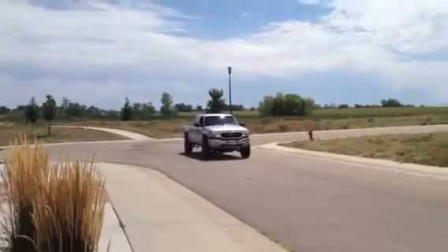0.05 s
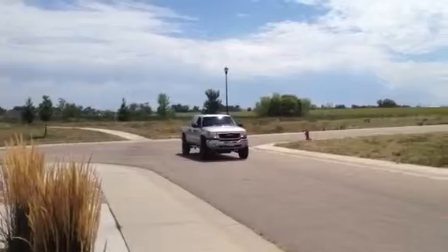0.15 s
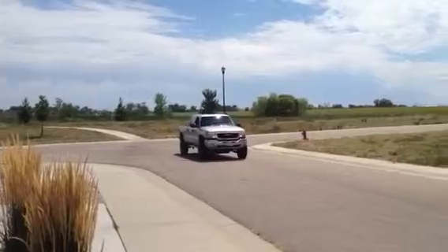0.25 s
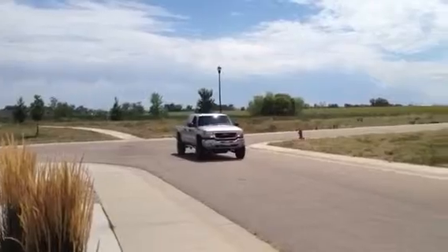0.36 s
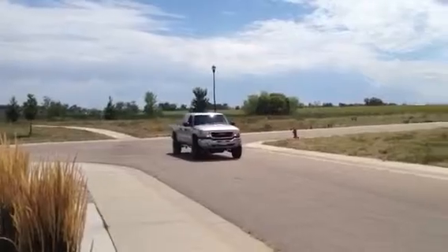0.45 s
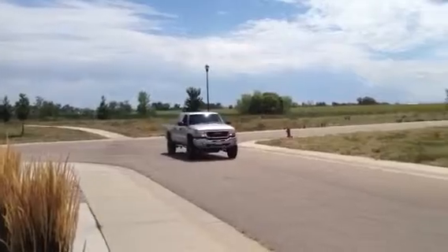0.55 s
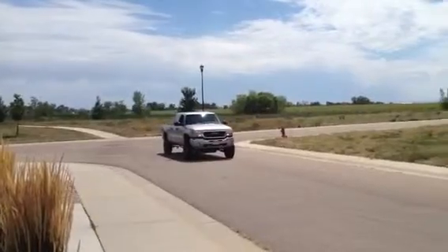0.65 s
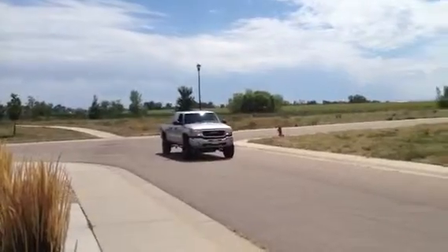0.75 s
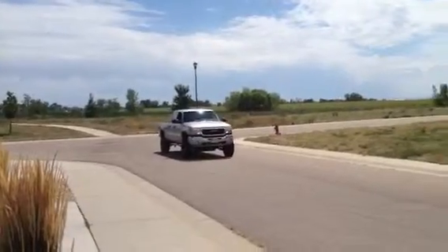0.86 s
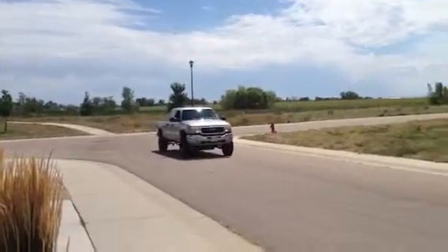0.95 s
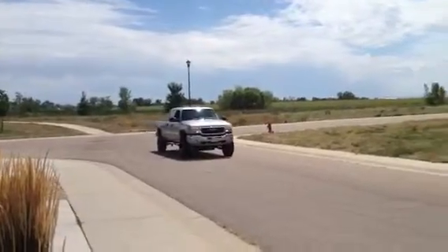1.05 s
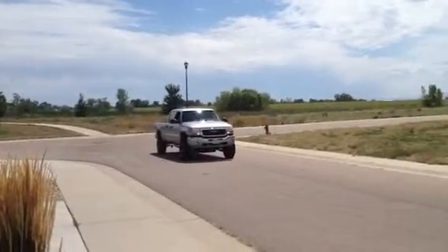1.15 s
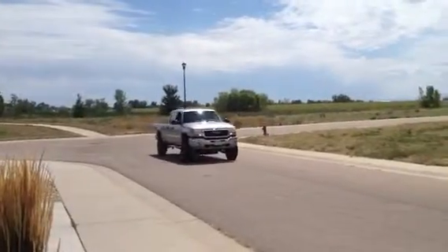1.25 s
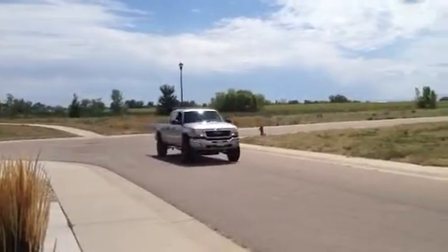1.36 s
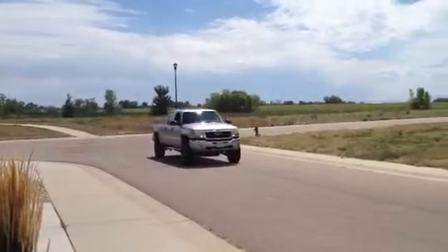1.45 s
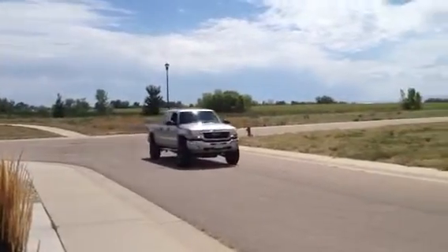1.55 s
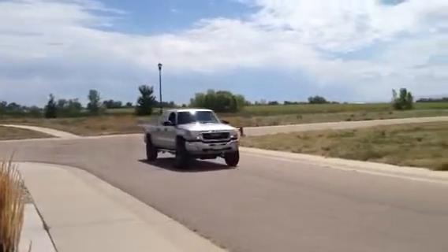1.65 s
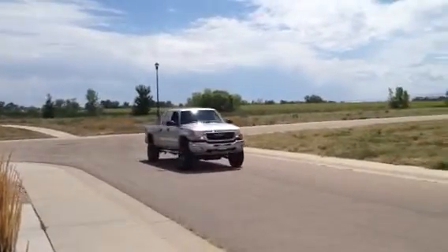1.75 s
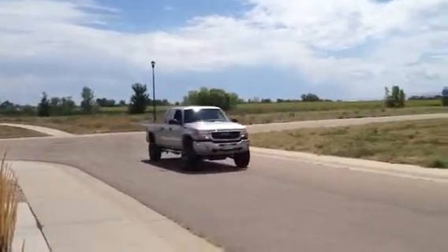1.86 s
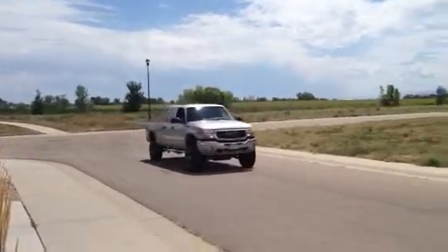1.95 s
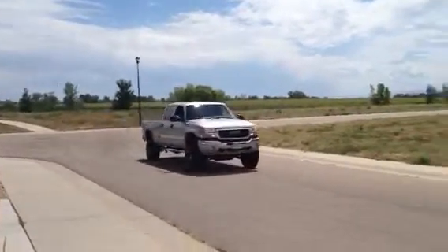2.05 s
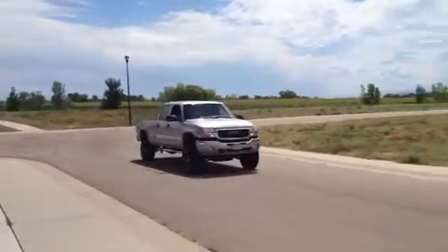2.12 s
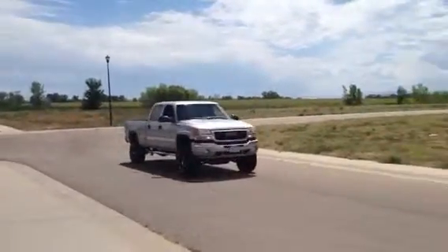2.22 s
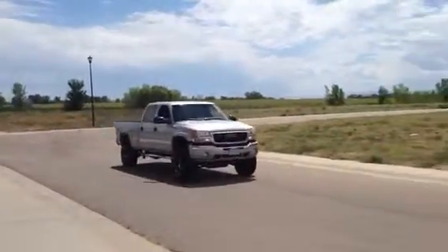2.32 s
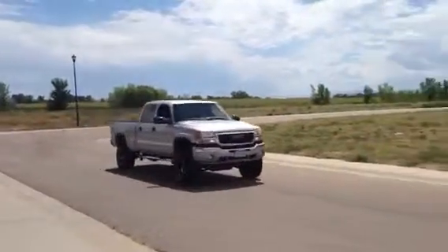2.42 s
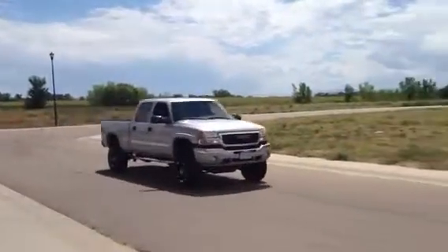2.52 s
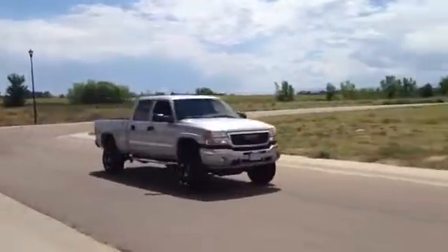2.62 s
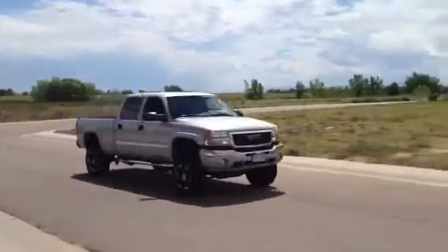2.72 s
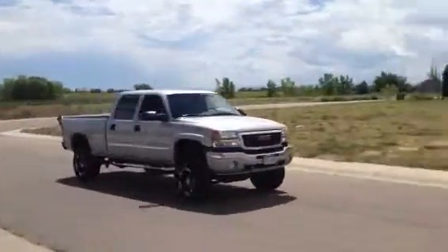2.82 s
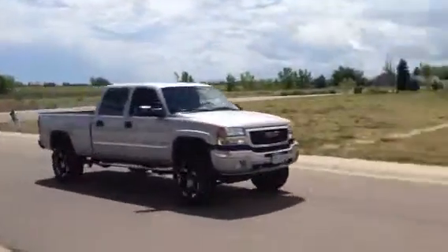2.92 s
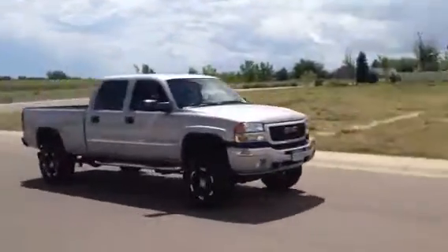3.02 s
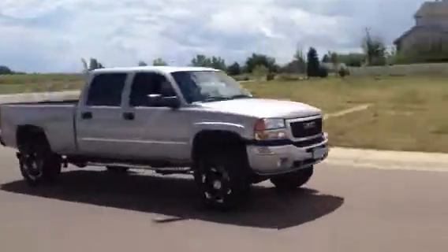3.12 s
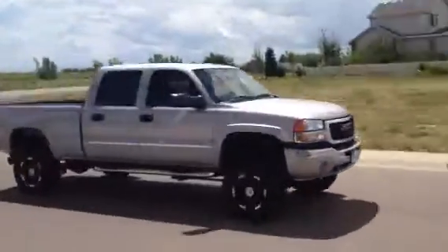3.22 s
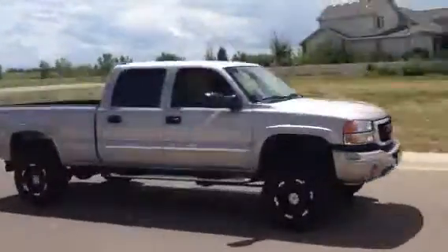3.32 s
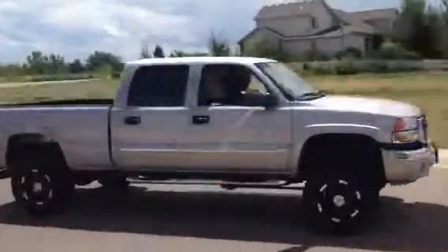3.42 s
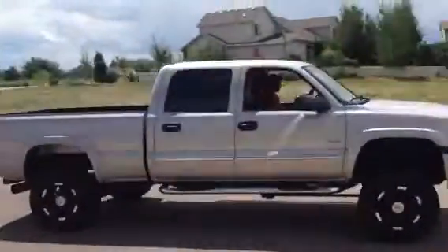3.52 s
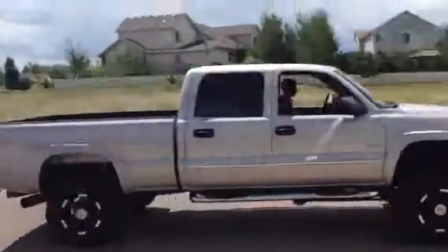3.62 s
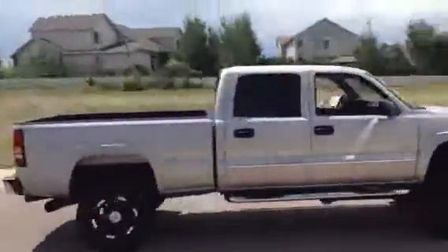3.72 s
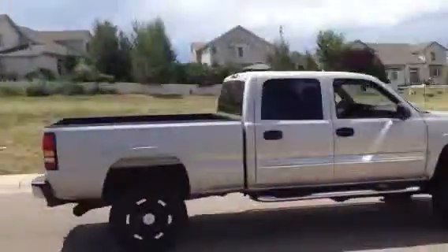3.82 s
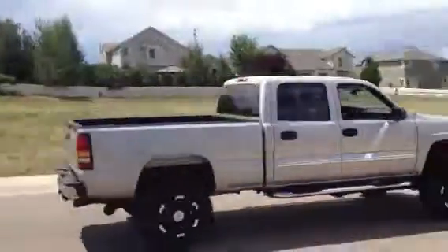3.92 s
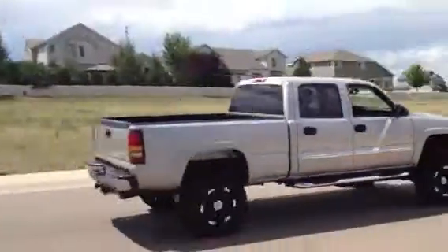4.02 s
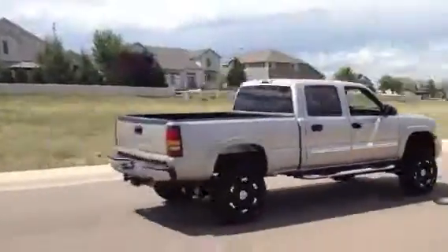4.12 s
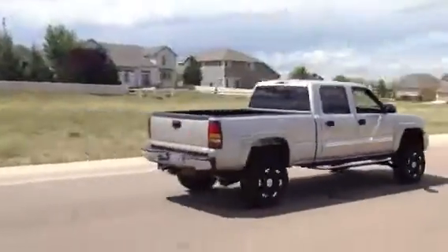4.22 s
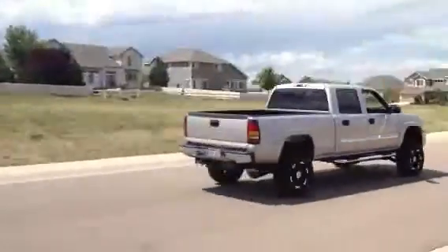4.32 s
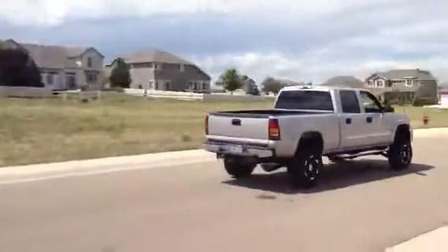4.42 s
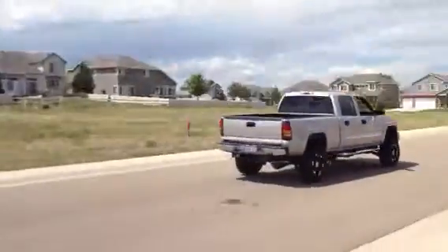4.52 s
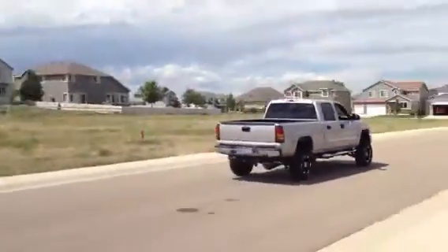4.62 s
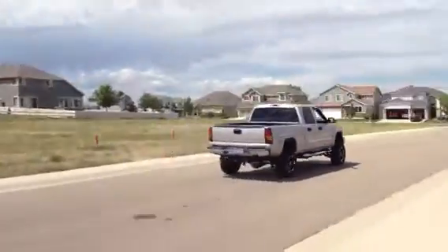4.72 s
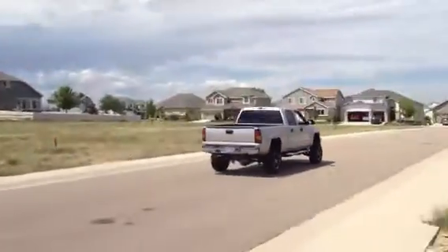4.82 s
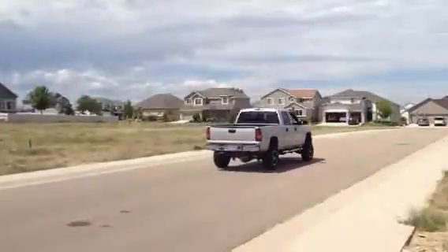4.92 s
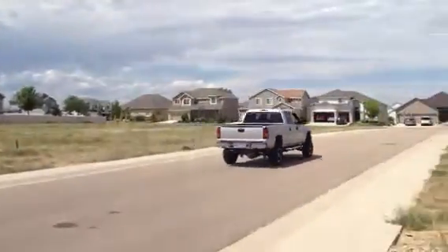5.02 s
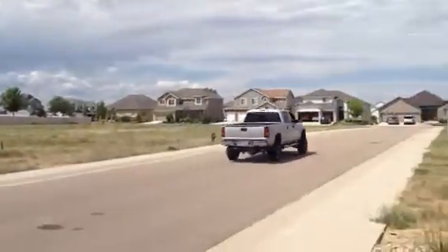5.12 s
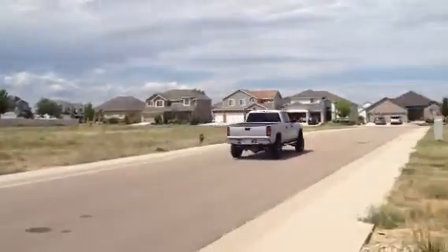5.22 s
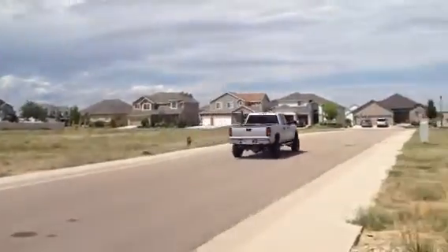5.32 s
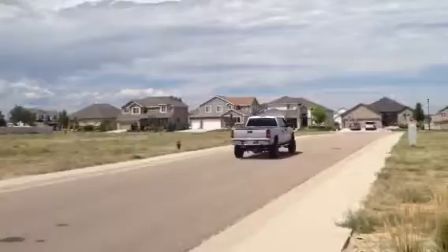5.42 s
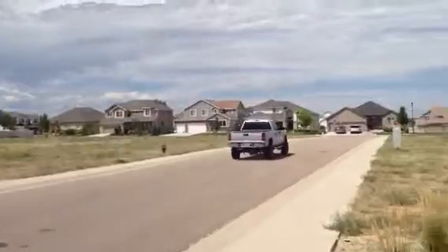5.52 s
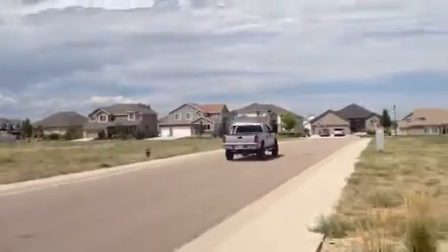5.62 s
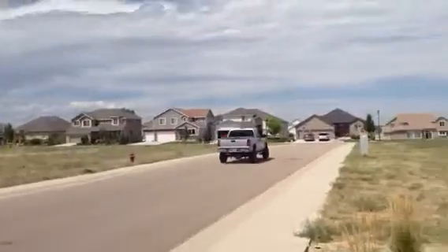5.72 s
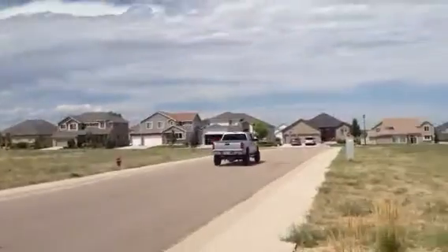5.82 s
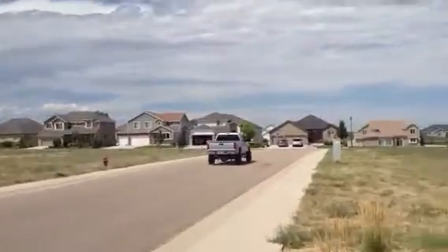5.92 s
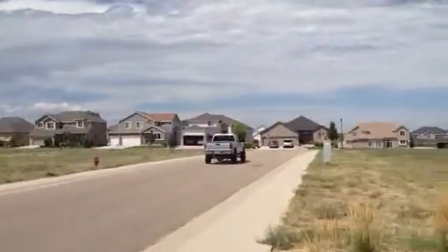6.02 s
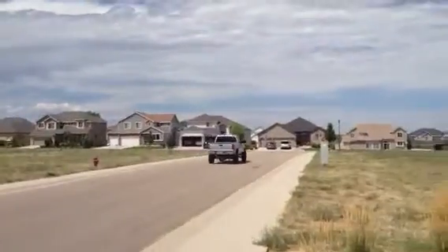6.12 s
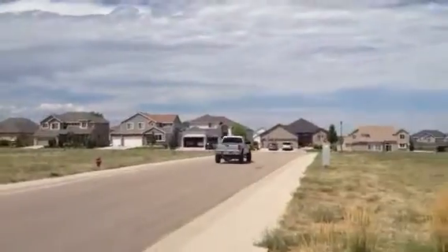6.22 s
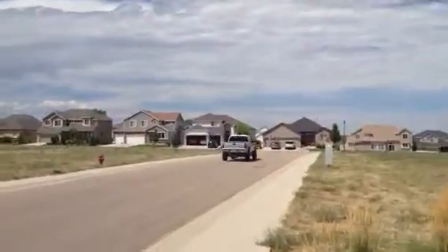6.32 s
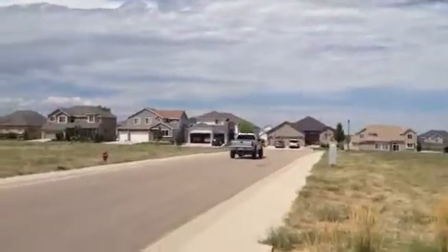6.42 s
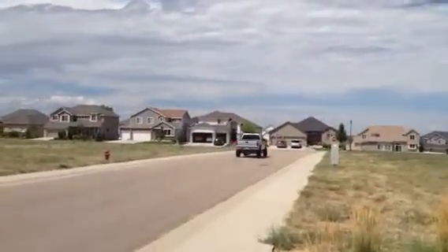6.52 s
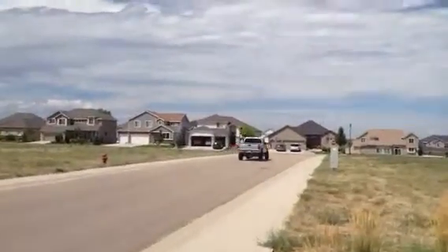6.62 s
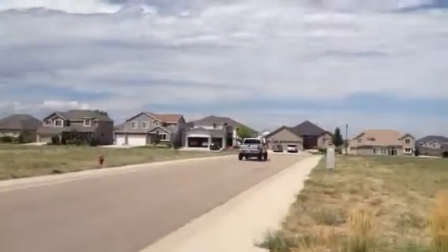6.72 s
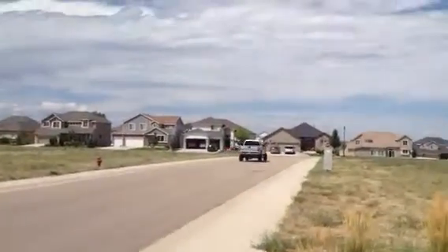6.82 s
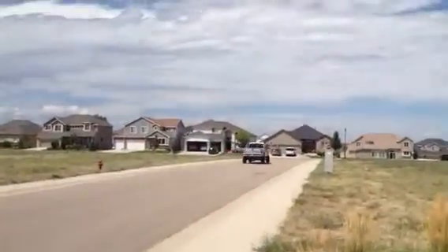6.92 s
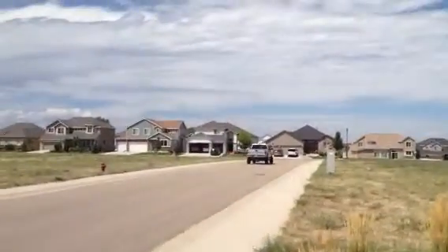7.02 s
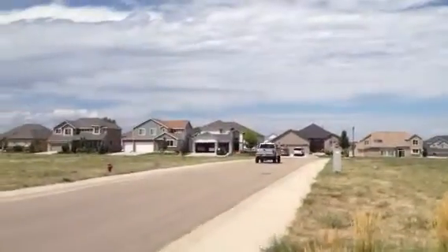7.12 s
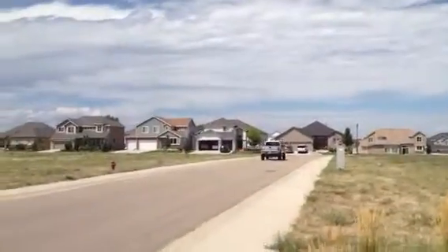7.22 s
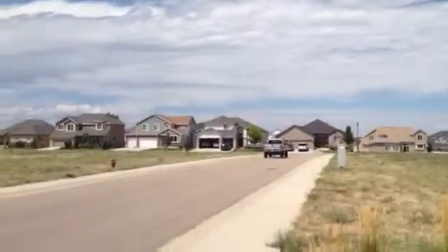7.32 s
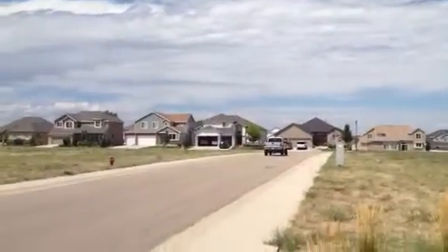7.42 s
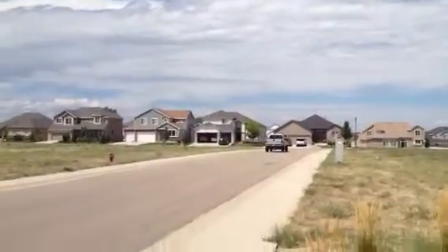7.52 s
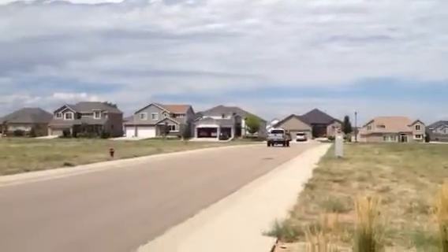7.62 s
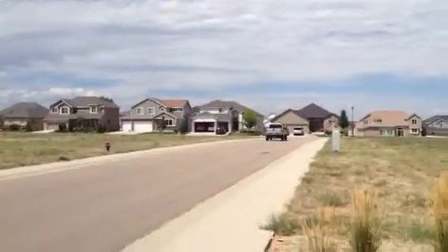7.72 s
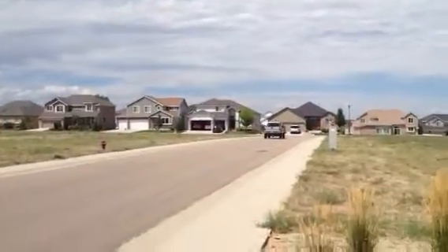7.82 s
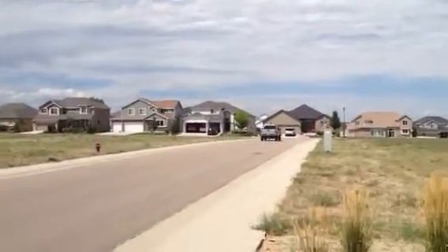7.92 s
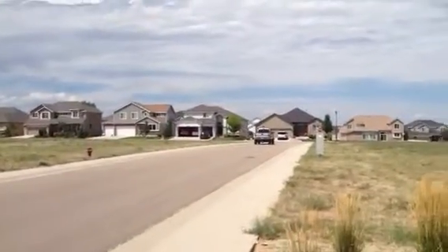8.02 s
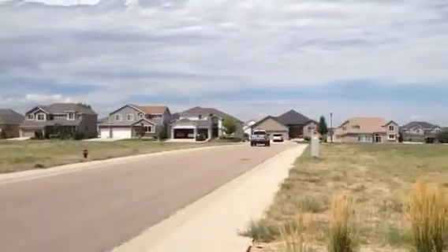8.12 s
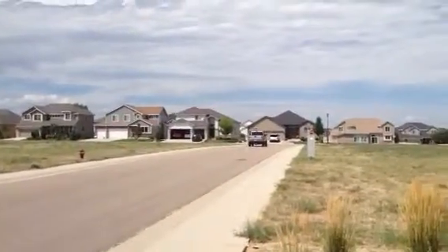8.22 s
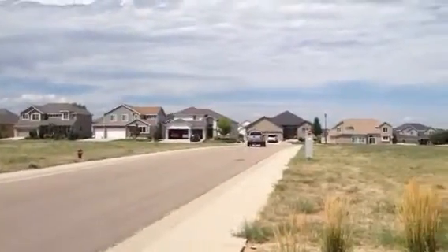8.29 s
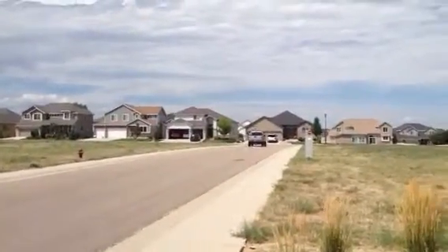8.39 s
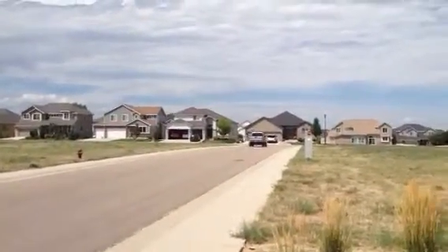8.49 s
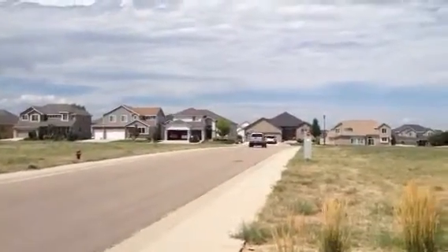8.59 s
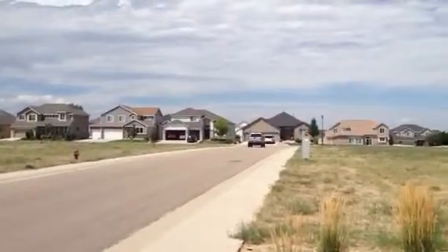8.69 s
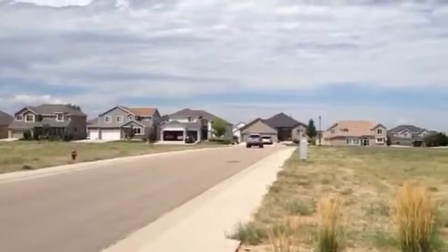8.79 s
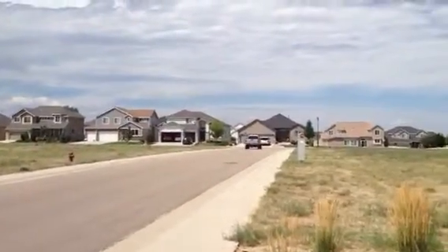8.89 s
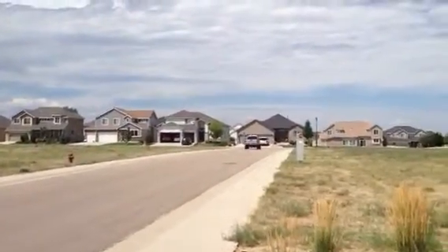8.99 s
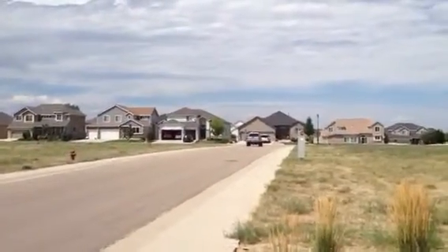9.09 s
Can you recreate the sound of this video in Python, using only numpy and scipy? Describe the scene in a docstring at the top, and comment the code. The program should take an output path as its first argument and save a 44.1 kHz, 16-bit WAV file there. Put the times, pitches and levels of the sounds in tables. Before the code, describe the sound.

Heard from a phone at the roadside: a diesel truck's smooth low hum swells into a forceful, buzzing growl with hissing intake and a rough whine at peak revs. The note drops at a gear change as the truck sweeps by, deep thuds bumping the microphone. Its tailpipe drones and barks while leaving, then the driver lifts off with a pop, grainy burble and sinking whoosh. Only faint distant town air and slight dry grass rustle remain.

```python
"""Diesel pickup pulling away

A V8 diesel pickup pulls away hard, shifts up as it passes a phone at the kerb, lifts off and rolls away.
The exhaust is sine tones in step with the engine, plus a bark of uneven pulses ringing in the tailpipe.
Filtered noise makes the tyre and engine-bay roar, body boom, intake hiss and fan rush; noisy gliding
tones make the turbo. Thuds, dry grass and a faint distant town lie beneath."""
import sys
import numpy as np
from scipy import signal
from scipy.fft import rfft, irfft, next_fast_len
from scipy.io import wavfile
from scipy.ndimage import uniform_filter1d

SR = 44100
rng = np.random.default_rng(int(sys.argv[2]) if len(sys.argv) > 2 else 0)


def int16_out(signal):
    """Quantize to a 16-bit WAV file."""
    q = np.round(np.clip(np.atleast_2d(signal).T, -1, 1) * 32767)
    wavfile.write(sys.argv[1], SR, q.astype(np.int16))


N = 403515
TIME = np.arange(N) / SR  # s

# Noise of the passing truck: (time [s], road roar [dB], body boom [dB], intake hiss [dB])
NOISE_LEVELS = [(0.0, -39.5, -42, -47), (1.3, -36, -37.5, -40.5), (1.8, -34, -35, -40),
                (2.3, -27.5, -32.5, -31.5), (2.5, -27.5, -27.5, -30), (2.73, -24, -25.5, -27),
                (2.8, -25.5, -28.5, -28.5), (2.88, -24.5, -26, -27.5), (2.92, -28.5, -30.5, -28.5),
                (3.3, -25, -28.5, -26.5), (3.41, -23.5, -32, -28.5), (3.55, -26, -32, -30),
                (3.9, -22.5, -29, -32), (4.1, -26, -30.5, -33.5), (4.25, -26.5, -33, -34.5),
                (4.4, -28.5, -35, -38), (5.07, -29, -25, -39.5), (5.45, -31, -30, -43),
                (5.55, -29.5, -31, -41), (5.65, -31.5, -28, -43), (5.71, -31, -35, -39.5),
                (5.76, -35, -37, -49), (5.78, -34, -28, -44.5), (6.19, -40, -43.5, -52),
                (6.75, -46.5, -50.5, -60), (7.25, -48.5, -49, -58), (7.57, -52, -54, -72),
                (8.41, -59, -58, -69.5), (9.15, -62.5, -63, -77)]
# One backfire as the throttle shuts: (time [s], level over the loudest usual bark [dB])
LIFT_POP = (5.779, 4)
COAST_DB = -8  # drop of the weak tones and the rumble off throttle

# The five views are the sides of the truck heard: 0 nose far, 1 nose near, 2 flank, 3 tail, 4 tail far.


def undb(db):
    """Turn decibels into a plain gain."""
    return 10 ** (np.asarray(db) / 20)


def unit(x):
    """Scale to an RMS level of 1."""
    return x / np.sqrt(np.mean(x ** 2))


def curves(table):
    """Draw each column of a table over time, with straight lines between its points."""
    s, *columns = np.transpose(table)
    return [np.interp(TIME, s, column) for column in columns]


def seen(view, view_db):
    """A level that depends on the side of the truck heard; beyond the last view it stays put."""
    return np.interp(view, range(len(view_db)), view_db)


def peak(x, hz, width_hz):
    """One resonance, which lets through mainly the sound near its own pitch."""
    return signal.lfilter(*signal.iirpeak(hz, hz / width_hz, fs=SR), x)


def walk(rate_hz):
    """A random wander: new levels at the given rate, joined smoothly; its spread is near 1."""
    position = TIME * rate_hz
    steps = rng.standard_normal(int(position[-1]) + 2)
    whole = position.astype(int)
    part = position % 1
    ease = part * part * (3 - 2 * part)
    return 1.2 * (steps[whole] + (steps[whole + 1] - steps[whole]) * ease)


def exhaust(cycle_hz, cycles, view, near_db, off_throttle):
    """Firings repeat each four-stroke cycle, so they sound as tones at multiples of the cycle rate."""
    # Strong tones: (time [s], multiple 8 (the firing rate) [dB], multiple 10 [dB], multiple 16 [dB])
    strong_levels = [(0.0, -37.5, -50, -38.5), (0.45, -40.5, -39, -42), (1.15, -36.5, -37, -37),
                     (1.55, -26.5, -32, -36.5), (2.0, -27, -26, -33), (2.38, -24.5, -18.5, -37),
                     (2.6, -14.5, -17.5, -46), (2.7, -18, -21, -36), (2.8, -11.5, -21.5, -47),
                     (2.9, -10, -29, -48), (3.15, -13, -30, -57), (3.31, -15.5, -20.5, -21.5),
                     (3.5, -13, -21, -35), (3.68, -14.5, -15.5, -28), (3.87, -19, -16, -48),
                     (4.02, -15.5, -14.5, -34), (4.12, -17, -19, -38), (4.28, -12.5, -16.5, -29),
                     (4.4, -12, -24, -35.5), (4.65, -17, -22.5, -29), (4.8, -17, -32, -38),
                     (5.0, -13.5, -24, -38), (5.2, -20.5, -27.5, -33.5), (5.5, -15.5, -33, -44),
                     (5.7, -17.5, -34, -58), (5.77, -20.5, -33, -48), (5.8, -28, -42, -52),
                     (5.92, -38, -50, -53), (6.17, -38.5, -45.5, -64), (6.3, -41, -39, -60),
                     (6.45, -47, -41, -62), (6.8, -52, -50.5, -61), (7.4, -56, -57, -62),
                     (7.75, -73, -74, -65), (9.15, -71, -79, -74)]
    # The three strong multiples: [times the cycle rate]
    strong_multiples = (8, 10, 16)
    # Slow swings of those three: [dB]
    strong_waver = (0.6, 0.9, 2.5)
    # Weak tones, from uneven pipe lengths: (multiple [times the cycle rate], level in each of five views [dB])
    weak_orders = [(4, -21, -21.5, -26, -25, 3), (5, -24, -30, -43, -45, -24), (7, -21, -14, -12, -19, -9),
                   (9, -14.5, -1.5, -9.5, -3.5, -9), (11, -11, -7, -12, -12.5, -2),
                   (12, -6, -5.5, -8, -6.5, -3), (13, -5, -8, -4, -11.5, -2),
                   (14, -2.5, -8.5, -13, -19, -22), (15, -9, -25, -13.5, -8.5, -13),
                   (17, -11.5, -16, -13, -33, -34), (18, -34, -11, -20, -17, -19),
                   (19, -27, -17, -26, -28, -19), (20, -16, -27, -31, -22, -17)]
    # All weak tones over the smoothed road roar: level in each of five views [dB]
    weak_over_roar = [0.89, -2.4, 1.4, 0.036, 2.1]
    sixth_db, knee_hz, fade_db_per_octave = -6.5, 137.7, 27  # multiple 6 fades below the knee
    coast_flutter_db = 2.5  # extra flutter of the strong tones off throttle

    octaves_below = np.minimum(np.log2(6 * cycle_hz / knee_hz), 0)
    level_db = near_db + sixth_db + fade_db_per_octave * octaves_below + 1.2 * walk(5)
    out = undb(level_db) * np.sin(2 * np.pi * 6 * cycles)

    for multiple, db, waver_db in zip(strong_multiples, curves(strong_levels), strong_waver):
        flutter_db = coast_flutter_db * off_throttle * walk(14)
        level_db = db + waver_db * walk(6) + .5 * walk(25) + flutter_db
        out += undb(level_db) * np.sin(2 * np.pi * multiple * cycles)

    weak_db = near_db + COAST_DB * off_throttle + seen(view, weak_over_roar)
    for multiple, *view_db in weak_orders:
        level_db = weak_db + seen(view, view_db) + 2.5 * walk(6)
        phase = 2 * np.pi * (multiple * cycles + rng.random()) + .6 * walk(8)
        out += undb(level_db) * np.sin(phase)
    return np.sqrt(2) * out  # makes the levels RMS


def bark(cycles):
    """One cylinder pops loudest each cycle, the others weaker and uneven; the tailpipe rings."""
    # Rings of the tailpipe: (pitch [Hz], width [Hz], level [dB])
    pipe_modes = [(582, 70, 0), (760, 200, -6), (400, 140, -7)]
    cylinder_db = np.array([0, -16, -14, -16, -8, -16, -14, -16.])

    slot = np.floor(8 * cycles).astype(int)  # counts the firings
    at = np.flatnonzero(np.diff(slot)) + 1
    level_db = cylinder_db[slot[at] % 8] + 1.5 * rng.standard_normal(len(at))
    # The two strongest pulses keep their sign; the weak ones vary at random in size and sign
    uneven = np.where(slot[at] % 4 == 0, 1, rng.standard_normal(len(at)))
    pulses = np.zeros(N)
    pulses[at] = undb(level_db) * uneven

    pop_s, pop_db = LIFT_POP
    pulses[int(pop_s * SR)] = undb(pop_db)
    soften = signal.butter(4, 1000, fs=SR, output="sos")  # a soft push, not a click
    pulses = signal.sosfilt(soften, pulses)
    return unit(sum(undb(db) * peak(pulses, hz, width_hz) for hz, width_hz, db in pipe_modes))


def noise(db, modes, view, puff, flicker_db):
    """Noise in resonances weighted by the side heard; each flickers alone, all share one puffing."""
    out, power = 0, 0
    for hz, width_hz, *view_db in modes:
        gain = undb(seen(view, view_db))
        band = peak(peak(rng.standard_normal(N), hz, width_hz), hz, width_hz)
        out = out + gain * undb(flicker_db * walk(12)) * unit(band)
        power = power + gain ** 2
    return undb(db) * puff * out / np.sqrt(power)


def road_roar(roar_db, view, firing, lump):
    """Tyres and engine bay roar as mid-pitched noise that puffs slightly with the engine."""
    # Resonances: (pitch [Hz], width [Hz], level in each of five views [dB])
    roar_modes = [(1108, 350, -4, -0.5, 0, 1.5, 6.5), (1357, 360, -1, 2, -2, 1, -18),
                  (1651, 440, 1.5, -0.5, 1, -2.5, -4), (1938, 480, -10.5, 3, -1.5, 6, -12.5),
                  (2464, 315, -3.5, -9, -4.5, 0.5, -15.5), (2770, 210, -35, -7.5, -7.5, -8.5, -17)]
    return noise(roar_db, roar_modes, view, 1 + 0.051 * firing + 0.035 * lump, 1.15)


def rumble(near_db, view, lump, off_throttle):
    """Low noise that swells once a crank turn and drops off throttle."""
    # Resonances: (pitch [Hz], width [Hz], level in each of five views [dB])
    rumble_modes = [(150, 90, -9, -5, -2, -3, 0), (230, 120, -7, -4, -2, -2, 0), (340, 130, 0, 0, 0, 0, -1)]
    # Rumble over the smoothed road roar: level in each of five views [dB]
    rumble_over_roar = [-8, -3, -7.5, -1.5, 4.5]
    level_db = near_db + COAST_DB * off_throttle + seen(view, rumble_over_roar) + 1.7 * walk(7)
    return noise(level_db, rumble_modes, view, 1 + 0.17 * lump, 0.51)


def body_boom(boom_db, view, bark_share):
    """The body booms as noise in a few resonances, taking the power that the bark leaves."""
    # Resonances: (pitch [Hz], width [Hz], level in each of five views [dB])
    boom_modes = [(500, 97, -4, 0.5, -17, -5.5, -3.5), (600.4, 107, 0.5, 3, -10, 3, -4.5),
                  (720, 180, -4.5, 8, 3, 2, 3), (860, 130, -8.5, -4, 8.5, -13.5, -10)]
    return noise(boom_db, boom_modes, view, np.sqrt(1 - bark_share), 1.2)


def intake_hiss(hiss_db, view, firing):
    """The intake hisses as high noise that puffs slightly with each firing."""
    # Resonances: (pitch [Hz], width [Hz], level in each of five views [dB])
    hiss_modes = [(3193, 850, -0.5, 2.5, 3.5, -20.5, 4.5), (3695, 750, -5, -4, -8, -1.5, -0.5),
                  (4220, 830, -5.5, -4, -9, -1.5, 2.5), (4940, 1100, -1.5, 3, 2.5, -4, -3.5),
                  (5710, 1040, 3.5, -0.5, -1, 0, -6), (6580, 1460, 4, 3.5, 6, 4.5, -5.5)]
    return noise(hiss_db, hiss_modes, view, 1 + 0.047 * firing, 1.16)


def fan_rush(hiss_db, view, firing):
    """The fan rushes as even higher noise, set against the hiss and puffing slightly."""
    # Resonances: (pitch [Hz], width [Hz], level in each of five views [dB])
    rush_modes = [(8060, 1650, -15, -4, 5, 3.5, 5), (9020, 1400, 3, 2, -9, -14, -11),
                  (10300, 1240, 2.5, -1, -4, -7.5, -5), (11300, 1200, -15, -3, -3, -0.5, -6),
                  (12500, 1100, 3, -1.5, 3, -5, -6), (14000, 1200, -5, -5, 6.5, -2, -4),
                  (15320, 800, -2, 1, -3, -3, -9)]
    # Rush over the hiss: level in each of five views [dB]
    rush_over_hiss = [-7.5, -8, -3, -7.5, -12.5]
    return noise(hiss_db + seen(view, rush_over_hiss), rush_modes, view, 1 + .04 * firing, 0.6)


def bay_ring(hiss_db, view, firing):
    """Noise in one narrow resonance rings in the engine bay and puffs with the firings."""
    # The ring: (pitch [Hz], width [Hz], list of levels over the hiss in five views [dB])
    hz, width_hz, over_hiss = (3370, 220, [-9.5, -19, -24, -30, -30])
    return noise(hiss_db + seen(view, over_hiss), [(hz, width_hz, 0)], view, 1 + .1 * firing, 1.2)


def burble(view, lump):
    """Grainy exhaust after the lift: strongly flickering noise that fades steadily from the backfire."""
    # Resonance: (pitch [Hz], width [Hz], level [dB])
    burble_modes = [(1180, 300, 0)]
    start_db, fade_db_per_s = -36.5, -28
    since = TIME - LIFT_POP[0]
    level_db = start_db + fade_db_per_s * since.clip(0)
    return (since > 0) * noise(level_db, burble_modes, view, 1 + .3 * lump, 4.9)


def whistle(table, width_hz):
    """A random wander on a gliding tone makes it a breathy band, silent outside its table."""
    hz, db = curves(table)
    on = (TIME > table[0][0]) & (TIME < table[-1][0])
    return on * undb(db) * walk(2 * width_hz) * np.sin(2 * np.pi * np.cumsum(hz) / SR)


def turbo():
    """Blades whistle higher as the turbo spools up, then lower after the lift; a blow-off whoosh falls."""
    # Blade whistle rising: (time [s], pitch [Hz], level [dB])
    spool_up = [(0, 11300, -72), (.3, 11950, -60), (.55, 12700, -57), (.9, 13900, -57), (1.1, 14700, -54),
                (1.3, 15250, -54), (1.4, 15500, -66)]
    # A second rising whistle, of the turbine: (time [s], pitch [Hz], level [dB])
    turbine = [(.1, 9600, -72), (.25, 10000, -62), (.6, 10900, -63), (1.0, 12000, -58), (1.25, 12750, -54),
               (1.45, 13400, -57), (1.65, 14000, -68)]
    # Blade whistle falling after the lift: (time [s], pitch [Hz], level [dB])
    spool_down = [(6.25, 15300, -75), (6.33, 14800, -68), (6.6, 12500, -70), (6.85, 11200, -86),
                  (7.2, 9400, -90), (7.35, 8800, -76), (7.6, 8100, -83), (8.0, 7100, -78),
                  (8.25, 6500, -92)]
    # Falling whoosh as the revs drop after the lift: (time [s], pitch [Hz], level [dB])
    blow_off = [(6.28, 9800, -70), (6.38, 8000, -59), (6.48, 6300, -59), (6.62, 4600, -63),
                (6.8, 3000, -70)]
    blades = whistle(spool_up, 260) + whistle(turbine, 130) + whistle(spool_down, 260)
    return blades + whistle(blow_off, 600)


def whine():
    """A rough whine at peak revs, made as a narrow breathy band."""
    # (time [s], pitch [Hz], level [dB])
    whine_path = [(2.4, 3050, -46), (2.6, 3110, -36), (2.75, 3160, -33), (2.88, 3300, -32),
                  (3.1, 3300, -46)]
    return whistle(whine_path, 120)


def hum():
    """A faint rising hum while pulling away, made as a very narrow breathy band."""
    # (time [s], pitch [Hz], level [dB])
    hum_path = [(.15, 890, -56), (.3, 915, -46), (.45, 950, -46), (.55, 965, -58)]
    return whistle(hum_path, 22.8)


def thuds():
    """Dull thuds while the truck is closest: short one-sided pushes in the deep bass."""
    # (time [s], peak level [dB])
    thud_times = [(2.765, -36), (2.885, -36), (3.335, -31), (3.38, -30), (3.425, -37), (3.51, -37),
                  (3.61, -35), (3.69, -38), (3.825, -37), (4.055, -34), (4.23, -38), (4.272, -26),
                  (4.318, -28)]
    push_s = 0.0063
    kicks = np.zeros(N)
    for s, db in thud_times:
        kicks[int(s * SR)] = undb(db)
    return np.convolve(kicks, np.hanning(int(push_s * SR)), "same")


def deep():
    """Deep ground rumble of the road: low noise that follows the roar."""
    over_roar_db, low_hz, high_hz = -39, 30, 70
    band = signal.butter(2, [low_hz, high_hz], "bandpass", fs=SR, output="sos")
    x = signal.sosfilt(band, rng.standard_normal(N))
    return undb(curves(NOISE_LEVELS)[0] + over_roar_db) * unit(x)


def grass():
    """Dry grass stirs near the phone: dense tiny crackles ring in the stalks, in a few soft swells."""
    # Bell-shaped swells: (time of the top [s], level at the top [dB], spread [s])
    swells = [(7.903, -70, .04), (8.1, -72, .12), (8.55, -67, .07), (8.83, -71, .02)]
    swell = sum(undb(db) * np.exp(-.5 * ((TIME - s) / spread_s) ** 2) for s, db, spread_s in swells)
    ticks = rng.standard_normal(N) * (rng.random(N) < .05)
    stalks = peak(ticks, 4500, 1200) + .7 * peak(ticks, 4700, 1500)
    return swell * unit(stalks)


def floor():
    """Distant town and air: steady noise shaped to be strongest in the low pitches."""
    # Shape of the noise: (pitch [Hz], relative level [dB])
    spectrum = [(12, -70), (20, -38), (128, -13), (200, 2.5), (411, -9), (697, -1.5), (1090, -2.5),
                (1790, -19), (2400, -15), (2790, -20), (3120, -28), (6070, -22), (9730, -42), (13000, -35),
                (15200, -35)]
    level_db = -57
    hz, db = np.transpose(spectrum)
    size = next_fast_len(N)
    f = np.maximum(np.fft.rfftfreq(size, 1 / SR), 1)
    shape = undb(np.interp(np.log(f), np.log(hz), db))
    shaped = irfft(rfft(rng.standard_normal(size)) * shape, size)[:N]
    return undb(level_db) * unit(shaped)


def scene():
    """Drive all the truck's sounds from one engine speed and one passing view, then add the surroundings."""
    # Climbs in first gear, shifts up, lifts off, winds down: (time [s], four-stroke cycle rate [Hz])
    engine_speed = [(0.0, 14.64), (0.6, 15.61), (1.2, 16.92), (1.7, 18.8), (2.1, 20.97), (2.5, 23.73),
                    (2.95, 27.3), (3.2, 23.4), (3.32, 22.7), (3.75, 22.3), (4.2, 22.3), (4.75, 23.0),
                    (4.92, 22.4), (5.2, 22.19), (5.4, 22.38), (5.65, 23.83), (5.8, 21.93), (6.15, 21.74),
                    (6.45, 16.7), (6.7, 16.2), (7.1, 14.49), (7.4, 13.97), (7.7, 11.8), (9.15, 12.2)]
    # Side of the truck heard: (time [s], view [0-4, more counts as 4])
    passing_view = [(0, 0), (1.8, 0.35), (2.6, 0.92), (3.1, 0.98), (3.85, 2.1), (4.6, 3), (5.4, 3),
                    (6.1, 3.5), (6.7, 3.5), (7.6, 3.5), (9.15, 7)]
    # Tailpipe bark, largest while the pipe points back under load: (time [s], share of the boom's power [0-1])
    bark_part = [(0, .1), (3.2, 0.1), (3.35, 0.54), (3.6, 0.27), (4.5, 0.13), (4.95, 0.44), (5.25, 0.56),
                 (5.8, 0.11), (9.15, 0)]
    loud_firing_s = 5.156  # one moment at which the loud cylinder fires
    lift_s, lift_fade_s = 5.63, .25
    near_s = .6  # the bass follows the roar smoothed over this time

    cycle_hz = curves(engine_speed)[0]
    cycles = np.cumsum(cycle_hz) / SR
    cycles = cycles - cycles[int(loud_firing_s * SR)]
    firing = np.cos(2 * np.pi * 8 * cycles)  # eight firings a cycle
    lump = np.cos(2 * np.pi * 2 * cycles)  # once a crank turn

    roar_db, boom_db, hiss_db = curves(NOISE_LEVELS)
    near_db = uniform_filter1d(roar_db, int(near_s * SR))
    view = curves(passing_view)[0]
    bark_share = np.clip(curves(bark_part)[0], 0, .95)
    off_throttle = np.clip((TIME - lift_s) / lift_fade_s, 0, 1)

    truck = exhaust(cycle_hz, cycles, view, near_db, off_throttle)
    truck += np.sqrt(bark_share) * undb(boom_db) * bark(cycles)
    truck += road_roar(roar_db, view, firing, lump)
    truck += rumble(near_db, view, lump, off_throttle)
    truck += body_boom(boom_db, view, bark_share)
    truck += intake_hiss(hiss_db, view, firing)
    truck += fan_rush(hiss_db, view, firing)
    truck += bay_ring(hiss_db, view, firing)
    truck += burble(view, lump)
    truck += turbo() + whine() + hum()
    return (truck + grass() + floor())[None]


def record(dry):
    """The phone cuts the bass (thuds and ground rumble get past), bends, squashes peaks and cuts the top."""
    bass_cut_hz, top_hz = 95, 15320
    knee, squash = .62, .5  # half of what rises above the knee is taken away
    bass_cut = signal.butter(6, bass_cut_hz, "highpass", fs=SR, output="sos")
    x = signal.sosfilt(bass_cut, dry) + thuds() + deep()
    bend = 0.012 * x ** 2
    excess = np.sign(x) * np.maximum(np.abs(x) - knee, 0)
    x = x - bend - squash * excess
    top_cut = signal.ellip(14, .2, 80, top_hz, fs=SR, output="sos")
    return signal.sosfilt(top_cut, x)


dry = scene()
out = record(dry)
int16_out(out)
```